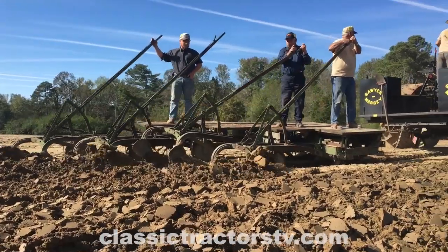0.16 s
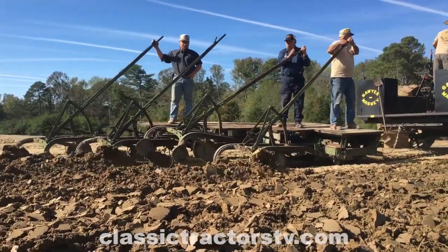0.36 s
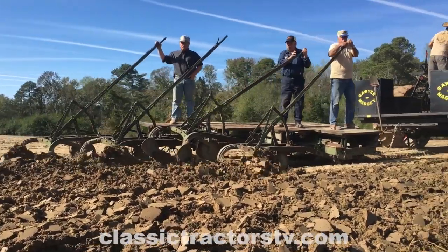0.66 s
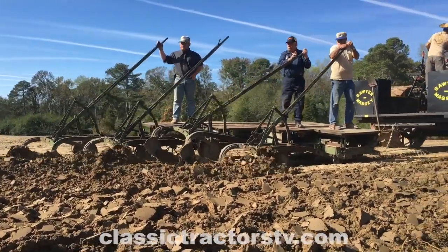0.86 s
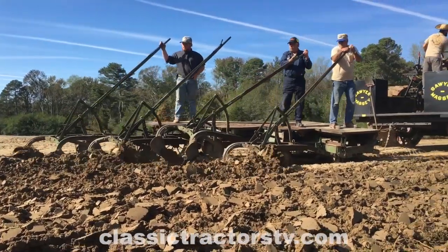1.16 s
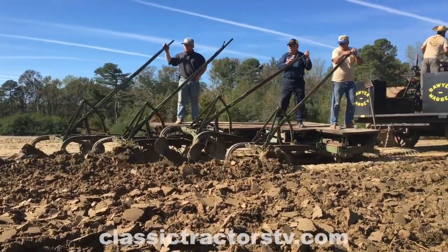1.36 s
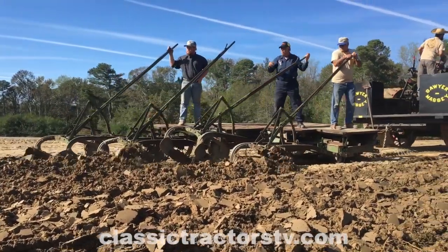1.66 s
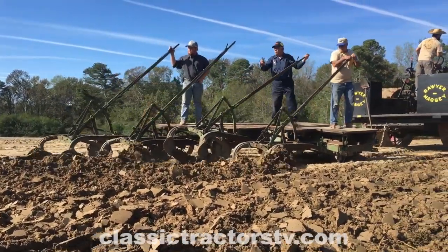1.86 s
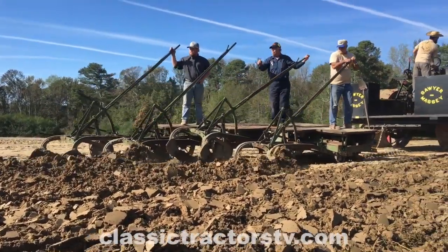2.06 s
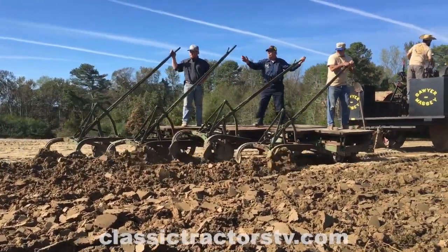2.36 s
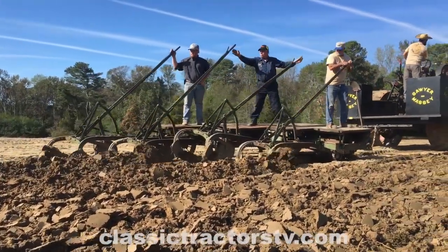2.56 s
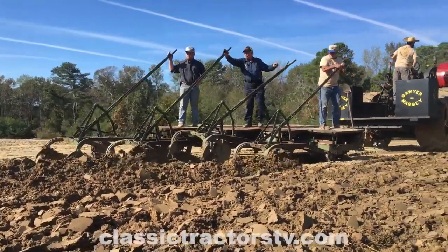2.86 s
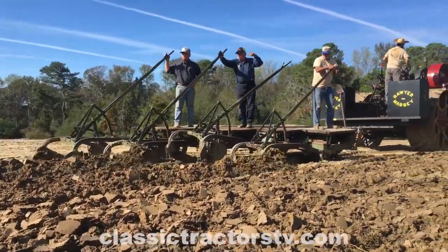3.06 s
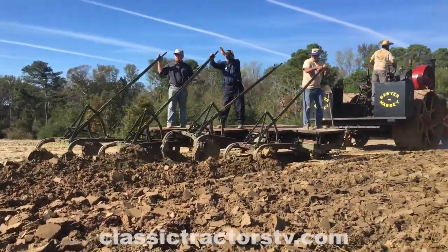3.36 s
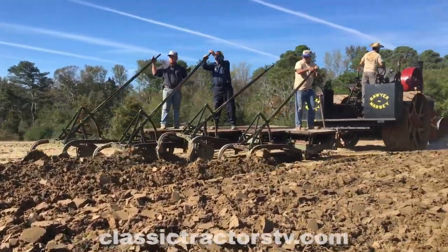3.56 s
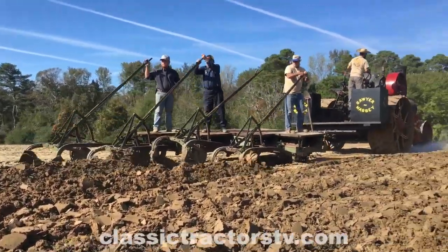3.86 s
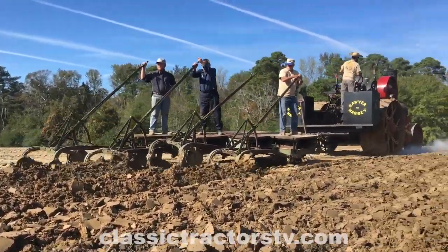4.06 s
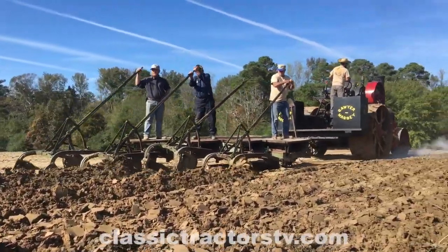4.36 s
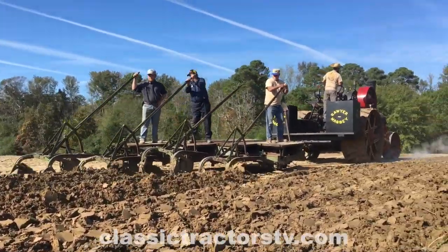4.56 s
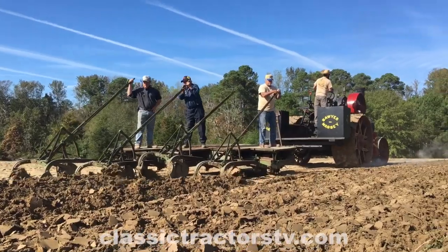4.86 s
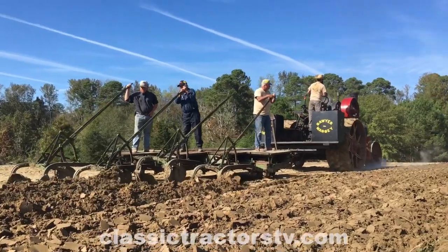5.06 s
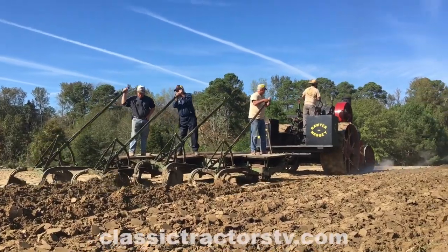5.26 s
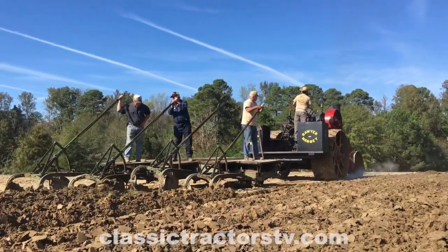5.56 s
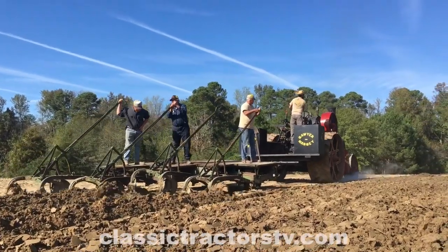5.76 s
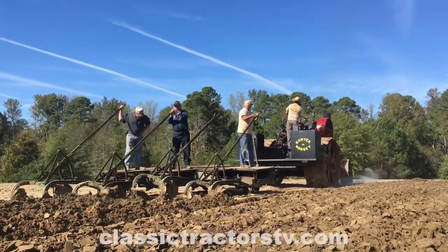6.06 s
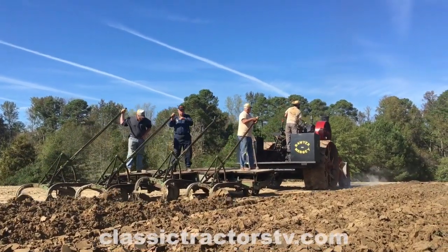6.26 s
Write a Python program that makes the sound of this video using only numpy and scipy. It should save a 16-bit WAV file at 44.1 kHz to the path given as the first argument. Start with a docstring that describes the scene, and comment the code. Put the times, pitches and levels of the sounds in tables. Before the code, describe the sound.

In an open dry field, a steam traction engine hauls a plow past and away. Its exhaust barks about six times a second, weak and strong in turn, each with a soft hiss and low boom. A surging bass rumble and narrow drone continue beneath, with a rough rush of torn soil, crumbling grains and dull iron clinks. The microphone stands outdoors nearby, with little echo.

```python
"""A dry field: a steam traction engine hauls a plow past and away, slowly gaining speed.
Each piston stroke gates noise into a chuff up the stack, weak and strong in turn, with a boom of smokebox
resonances. Surging low noise and a narrow drone rumble on beneath. Scrapes and rings of ironwork follow the crank,
soil noise and random grains are the shares tearing the ground, and a short scattered tail is the field."""
import sys
import numpy as np
from scipy import signal
from scipy.fft import rfft, irfft, next_fast_len
from scipy.io import wavfile
from scipy.ndimage import uniform_filter1d, map_coordinates

SR = 44100
rng = np.random.default_rng(int(sys.argv[2]) if len(sys.argv) > 2 else 0)


def materialize(psi):
    """Save the field psi as 16-bit PCM at rate SR to the path in sys.argv[1].

    A 1-D psi becomes a single channel; in a 2-D psi each row is a channel.
    """
    bounded = np.clip(np.atleast_2d(psi).T, -1, 1)
    quanta = np.round(bounded * 32767).astype(np.int16)
    wavfile.write(sys.argv[1], SR, quanta)


N = 282681

# exhaust strokes, two to a turn of the crank, the weak one first:
# start_s [s], bark_db [dB], hiss_db [dB against the bark]
STROKES = [(0.025, -39.5, -13), (0.191, -38, -14), (0.376, -40, -14.5), (0.548, -37.5, -17.5),
           (0.733, -40.5, -18.5), (0.903, -37, -16.5), (1.095, -40.5, -14.5), (1.268, -37, -11.5),
           (1.462, -41.5, -13.5), (1.632, -38.5, -12), (1.824, -41.5, -15.5), (1.994, -38, -16.5),
           (2.18, -42, -15), (2.349, -40.5, -18), (2.529, -42, -20), (2.696, -38.5, -16),
           (2.869, -42, -14.5), (3.031, -36.5, -15.5), (3.203, -42, -12.5), (3.364, -37.5, -15),
           (3.539, -41.5, -17), (3.697, -38, -15.5), (3.873, -42.5, -17), (4.036, -40, -16.5),
           (4.21, -42, -13.5), (4.368, -38, -14.5), (4.544, -41.5, -16), (4.7, -39.5, -17.5),
           (4.87, -41, -19), (5.03, -41.5, -18.5), (5.198, -43.5, -17.5), (5.355, -41.5, -21.5),
           (5.516, -43, -18.5), (5.676, -38.5, -21), (5.835, -41, -16.5), (5.988, -39, -15.5),
           (6.151, -43, -19), (6.303, -40, -19.5)]


def amp(db):
    """Decibels to amplitude."""
    return 10 ** (np.asarray(db) / 20)


def unit(x):
    """x scaled to rms 1."""
    return x / np.sqrt(np.mean(x ** 2) + 1e-20)


def along(points, hz):
    """Reads (Hz, value) points on a log frequency axis."""
    f, v = np.transpose(points)
    return np.interp(np.log(hz + 1), np.log(f + 1), v)


def curve(points):
    """Reads (s, value) points at every sample."""
    s, value = np.transpose(points)
    return np.interp(np.arange(N) / SR, s, value)


def wobble(rate):
    """A smooth random curve, rate knots a second."""
    knots = rng.standard_normal(int(N * rate / SR) + 4)
    return map_coordinates(knots, [np.arange(N) * rate / SR])


def filtered(x, response):
    """x times a complex response of frequency."""
    m = next_fast_len(N + SR // 2)
    return irfft(rfft(x, m) * response(np.fft.rfftfreq(m, 1 / SR)), m)[:N]


def coloured(x, spectrum):
    """x shaped by (Hz, dB) points, falling steeply past the last one, at rms 1."""
    top_hz = spectrum[-1][0]
    return unit(filtered(x, lambda hz: amp(along(spectrum, hz)) / np.maximum(hz / top_hz, 1) ** 6))


def noise(spectrum):
    """Coloured noise of rms 1."""
    return coloured(rng.standard_normal(N), spectrum)


def resonate(x, modes):
    """x through parallel causal resonances of alternating sign: (Hz, width Hz, dB)."""
    def response(f):
        total = 0
        for k, (centre, width, db) in enumerate(modes):
            band = 1j * f * width
            total = total + (-1) ** k * amp(db) * band / (centre * centre - f * f + band)
        return total
    return filtered(x, response)


def patchy(x, depth_db):
    """Tints x with smooth random patches of level over time and frequency, at rms 1."""
    z = signal.stft(x, nperseg=1024)[2]
    tint = uniform_filter1d(rng.standard_normal(z.shape), size=5, axis=0)
    tint = uniform_filter1d(tint, size=5, axis=1)
    return unit(signal.istft(z * amp(depth_db * unit(tint)), nperseg=1024)[1][:N])


def steadied(x):
    """x at rms 1 with its slow swells evened out."""
    power = np.abs(uniform_filter1d(unit(x) ** 2, size=4000))
    return unit(x / np.sqrt(power + 0.014))


def strokes():
    """For every stroke: time, bark level, and the opening time, bite and thump of its end of the cylinder."""
    # the two ends of the cylinder, weak then strong: opening_s [s], bite_db [dB, upper bark over lower],
    # thump_db [dB, only the difference between the ends counts]
    cylinder_ends = [(0.0058, 0, -41), (0.0066, 1.35, -37.5)]
    s, bark_db, _ = np.transpose(STROKES)
    return s, bark_db, *np.array(cylinder_ends)[np.arange(len(s)) % 2].T


def turns():
    """Time of each strong stroke and the length of the crank turn around it."""
    s = np.array(STROKES)[1::2, 0]
    return zip(s, np.gradient(s))


def puffs(levels_db, lag, hold, t60, swell=1):
    """Steam flow swells as the valve opens, holds while it is open, then dies as the cylinder empties."""
    usual_db, held_s, held_s_per_db = -40, 0.02, 0.003  # a harder stroke empties the cylinder sooner
    flow, t = np.zeros(N), np.arange(N) / SR
    for s, bark_db, opening, db in zip(*strokes()[:3], levels_db):
        held = max(held_s - held_s_per_db * (bark_db - usual_db), 0)
        near = slice(max(int((s - .06) * SR), 0), int((s + .25) * SR))
        age = t[near] - s - lag
        valve = (1 + np.tanh(age / (swell * opening))) / 2
        flow[near] += valve * amp(db - 60 * np.maximum(age - hold * held, 0) / t60)
    return flow


def rumble():
    """The draught through the fire and the gears keep up a surging roll; the air in the flues drones with it."""
    # level of the low roll, fullest in mid-pass: time_s [s], level_db [dB]
    roll_level = [(0, -44), (1.6, -44.3), (2.8, -43.3), (3.8, -41.8), (4.6, -42.8), (5.3, -42.3),
                  (5.8, -45), (6.41, -45)]
    # colour of the roll: freq_hz [Hz], level_db [dB per Hz, relative]
    draught_colour = [(18, -50), (28, -18), (40, -7), (55, 4.5), (68, -10), (79, -1.5), (92, -2), (102, -3),
                      (125, -4.5), (150, -12), (172, -11), (200, -18.5), (300, -32), (500, -74)]
    drone_colour = [(55, -19.5), (67, -3.5), (70.5, 16.5), (74, -8), (88, -53)]
    roll_surge_db, drone_surge_db = 2.6, 2.5  # scale of the random swells
    drone_db = -1  # against the roll
    roll = steadied(noise(draught_colour)) * amp(roll_surge_db * wobble(16))
    drone = steadied(noise(drone_colour)) * amp(drone_surge_db * wobble(9))
    return amp(curve(roll_level)) * (unit(roll) + amp(drone_db) * unit(drone))


def plow():
    """The shares tear the soil with a rough rush, and dry clods crumble in small grains."""
    # how hard the shares tear the ground: time_s [s], drag_db [dB, before the soil and crumb offsets]
    drag = [(0.0, -53.5), (0.05, -53), (0.5, -57.5), (1.5, -57), (1.59, -58), (2.62, -57), (3.05, -53),
            (3.21, -52.5), (3.57, -56), (4.19, -57), (4.93, -54), (5.64, -58), (6.09, -55), (6.41, -55)]
    # colours of the rush and of the grains: freq_hz [Hz], level_db [dB per Hz, relative]
    soil_colour = [(100, 16), (200, 8), (290, 9), (380, 11), (450, 3), (700, 5.5), (1100, 2), (1600, 0.5),
                   (2300, -4), (3000, -10.5), (4200, -24.5), (6500, -44), (12000, -45)]
    crumb_colour = [(1500, -27), (3500, 5.5), (5500, -2), (7000, -9), (9500, -17), (12000, -23),
                    (14000, -28), (15500, -44)]
    soil_db, crumb_db = 3, -20.5  # against the drag
    drag_db = curve(drag)
    tearing = wobble(30)
    rush = amp(drag_db + soil_db + 1.94 * tearing) * patchy(noise(soil_colour), depth_db=1.0)

    falls = rng.random(N) < 1200 / SR  # about 1200 grains a second
    sizes = amp(2.3 * rng.standard_exponential(N).clip(0, 3))
    grains = falls * sizes * rng.standard_normal(N)
    crumble = coloured(unit(grains) + .9 * rng.standard_normal(N), crumb_colour)
    crumble = patchy(crumble, depth_db=1.4)
    return rush + amp(drag_db + crumb_db + 1.6 * tearing + 1.1 * wobble(70)) * crumble


def exhaust():
    """The turbulent jet barks in the stack; its hiss peaks later, and the ring fades as the engine turns away."""
    # bark heard from the side and from behind, and the hiss: freq_hz [Hz], level_db [dB per Hz, relative]
    side_colour = [(120, -26), (250, -2), (320, 2.5), (385, 2), (450, -9), (540, 1), (700, 2.5), (950, 1),
                   (1170, -1), (1430, -8.5), (1850, 0), (2500, -2.5), (2930, -14), (3300, -9.5),
                   (4500, -23.5), (7000, -36)]
    rear_colour = [(120, -22), (250, -2), (320, 3), (385, 3), (455, -10), (610, 3.5), (780, -2.5),
                   (1100, 2), (1400, -2.5), (1650, -6), (2000, 0), (2550, -2.5), (2950, -14), (3900, -17),
                   (6000, -41)]
    hiss_colour = [(2000, -14), (3500, 7.5), (4500, 2.5), (5500, 1), (7500, -6.5), (9300, -8.5),
                   (10400, -15), (11300, -15), (13500, -21.5), (14800, -27), (15600, -30)]
    # resonances of the stack: freq_hz [Hz], width_hz [Hz], level_db [dB, relative]
    stack_modes = [(689, 41, -7.5), (1910, 72, -8.5), (2095, 20, -9.5)]
    bite_db_per_s = -0.45  # the bark dulls as the engine draws away
    s, bark_db, _, end_bite_db, _ = strokes()
    bite_db = end_bite_db + bite_db_per_s * s
    hiss_db = np.array(STROKES)[:, 2]

    away = np.clip(np.arange(N) / SR / 5, 0, 1)  # side view to rear view in 5 s
    jet = np.sqrt(1 - away) * noise(side_colour) + np.sqrt(away) * noise(rear_colour)
    ring = amp(-2 - 12.2 * away) * unit(resonate(rng.standard_normal(N), stack_modes))
    bark = patchy(unit(jet + ring), depth_db=2.04)

    lower = filtered(bark, lambda hz: 1 / (1 + (hz / 1400) ** 6))
    upper = bark - lower
    body = lower * puffs(bark_db - bite_db / 2 + 0.32, lag=-0.00088, hold=0.84, t60=0.19)
    bite = upper * puffs(bark_db + bite_db / 2 + 0.18, lag=0.0014, hold=0.72, t60=0.16, swell=1.1)
    hiss = patchy(noise(hiss_colour), depth_db=1.7)
    hiss = hiss * puffs(bark_db + hiss_db, lag=0.0044, hold=0.58, t60=0.13, swell=1.65)
    sputter = amp(1.1 * wobble(420) + 1.1 * wobble(100))
    return (body + bite + hiss) * sputter


def field(x):
    """Rough ground and distant trees scatter a thin, dull tail."""
    # decay of the field and its tree line: freq_hz [Hz], t60_s [s]
    field_decay = [(100, 1), (600, 0.37), (2200, 0.1), (5000, 0.14), (12000, 0.14), (15000, 0.061)]
    hz, t, z = signal.stft(rng.standard_normal(SR // 2), SR, nperseg=256)
    decay = amp(-60 * t / along(field_decay, hz)[:, None])
    tail = signal.istft(z * decay, SR, nperseg=256)[1]
    delayed = np.pad(x, (int(.015 * SR), 0))
    return signal.fftconvolve(delayed, tail / np.linalg.norm(tail))[:N]


def thumps():
    """Each stroke shoves the air in the smokebox, which rings on for a few cycles; the boom weakens with distance."""
    # resonances of smokebox and firebox: freq_hz [Hz], width_hz [Hz], level_db [dB, relative]
    smokebox_modes = [(40, 16, -8), (69.6, 8.6, 4), (104, 24, -6), (168, 18, -4)]
    boom_colour = [(20, -30), (45, 3), (110, -1), (200, 1.5), (450, -23), (1500, -55)]
    boom_db, loss_db_per_s = -44.3, -1.1
    s, *_, end_db = strokes()
    thump_db = end_db + loss_db_per_s * s
    shoves = np.zeros(N)
    times = s + rng.normal(0, .002, len(s))
    shoves[np.clip((times * SR).astype(int), 0, N - 1)] = amp(thump_db)
    eddies = rng.standard_normal(N) * puffs(thump_db, lag=-0.0086, hold=0.96, t60=0.33)
    boom = resonate(unit(shoves) + 1.37 * unit(eddies), smokebox_modes)
    return amp(boom_db) * coloured(boom, boom_colour)


def ironwork():
    """The links of the valve gear take up their slack with the crank: a short scrape that rings the iron dully."""
    # slack taken up in every turn: place [turns after the strong stroke], level_db [dB, before scatter and
    # growth], ring_db [dB, ring over scrape before the final trims]
    clink_places = [(-0.167, -70, -1), (-0.09, -73.5, 4), (0.16, -76, 7), (0.47, -74, -2)]
    # now and then a link knocks harder: start_s [s], level_db and ring_db [dB, before the final trims]
    hard_knocks = [(0.2468, -62, 8), (0.8445, -68, 0), (2.1485, -68, 3), (2.631, -65, -4), (3.308, -65, 0),
                   (5.3043, -62, -4), (5.9386, -63, 0)]
    # colour of the scrape: freq_hz [Hz], level_db [dB per Hz, relative]
    scrape_colour = [(900, -12), (2500, 10.5), (5500, -1), (7500, -14), (10000, -16), (12500, -21)]
    # resonances of the ironwork: freq_hz [Hz], width_hz [Hz], level_db [dB, relative]
    iron_modes = [(2500, 400, 0.5), (5400, 330, -3), (6300, 400, -7), (9500, 500, -15)]
    scatter_db, growth_db_per_s = 2, 0.7  # from turn to turn; clinks grow as the engine speeds up
    t = np.arange(N) / SR
    contacts = []
    for s, turn_s in turns():
        for place, db, ring_db in clink_places:
            level_db = db + growth_db_per_s * (s - t.mean()) + scatter_db * rng.standard_normal()
            contacts.append((s + place * turn_s, level_db, ring_db))

    scrape, ring = np.zeros(N), np.zeros(N)
    for s, db, ring_db in contacts + list(hard_knocks):
        near = slice(int(s * SR), int(s * SR) + SR // 10)
        age = np.maximum(t[near] - s, 0)
        contact = amp(db - 60 * age / 0.058) * (1 - np.exp(-age / 0.0018))
        scrape[near] += contact * amp(-ring_db / 2)
        ring[near] += contact * amp(ring_db / 2)
    iron = unit(resonate(rng.standard_normal(N), iron_modes))
    return amp(5.5) * scrape * noise(scrape_colour) + amp(1.5) * ring * iron


def wisps():
    """A little steam slips past the valve just before it opens for the strong stroke."""
    # colour of the leak: freq_hz [Hz], level_db [dB per Hz, relative]
    wisp_colour = [(800, -24), (1700, 3.5), (2700, -2), (3500, -12.5), (5500, -19), (9500, -29.5),
                   (15000, -44)]
    wisp_db, loss_db_per_s = -57, -0.8  # the leak weakens with distance
    lead_s, width_s = 0.02, 0.016
    t = np.arange(N) / SR
    leak = sum(np.exp(-((t - s + lead_s) / width_s) ** 2) for s, _ in turns())
    return amp(wisp_db + loss_db_per_s * t) * leak * noise(wisp_colour)


def scene():
    """Engine and plow together; only the steam excites the field's tail."""
    steam = exhaust() + wisps()
    return (steam + amp(-18) * field(steam) + thumps() + rumble() + plow() + ironwork())[None]


def record(dry):
    """The microphone sheds the deepest bass and keeps nothing above its band limit."""
    low_cut_hz, top_hz = 26, 15600
    return filtered(dry[0], lambda hz: (hz < top_hz) * (1 - 1 / (1 + (hz / low_cut_hz) ** 6)))[None]


dry = scene()
out = record(dry)
materialize(out)
```